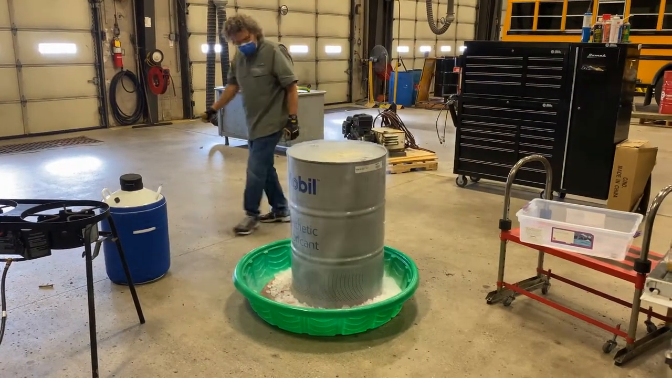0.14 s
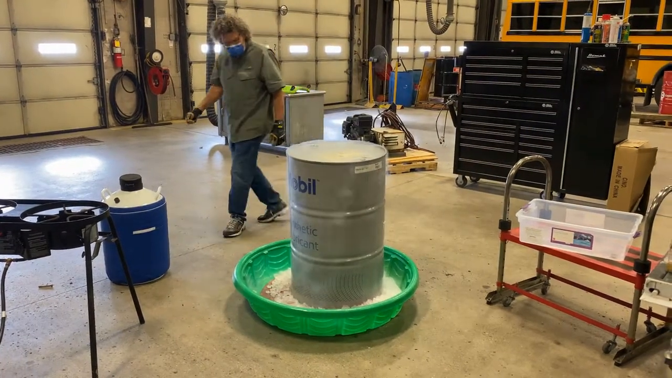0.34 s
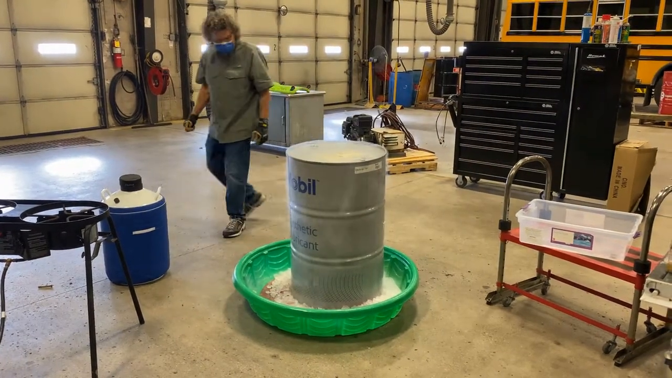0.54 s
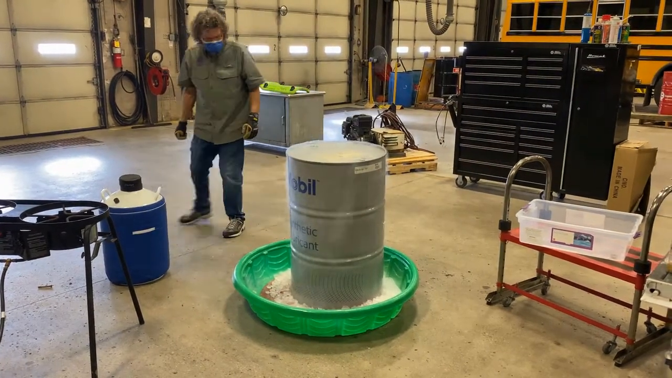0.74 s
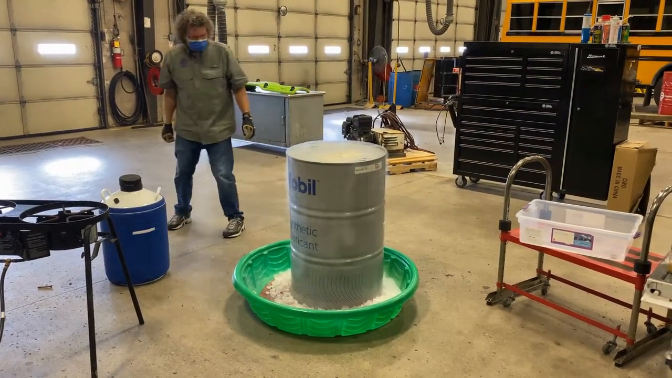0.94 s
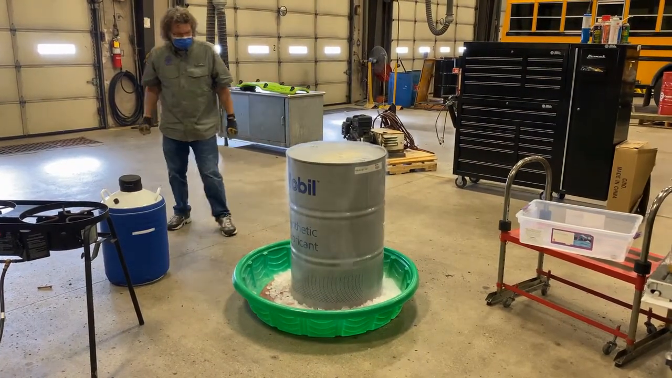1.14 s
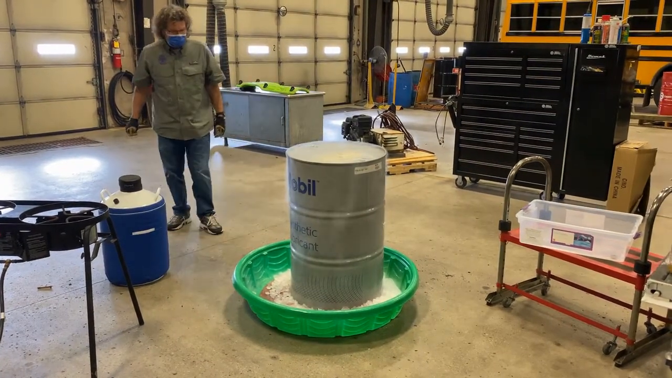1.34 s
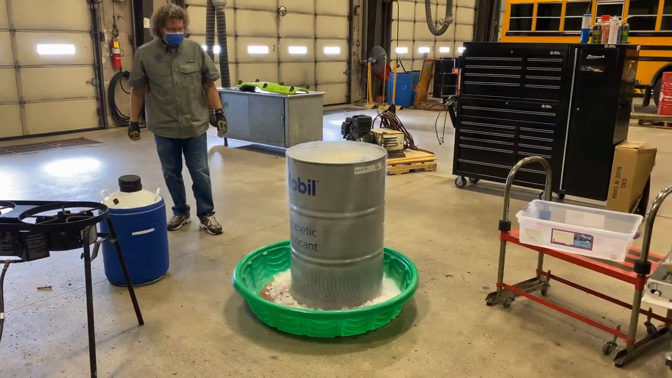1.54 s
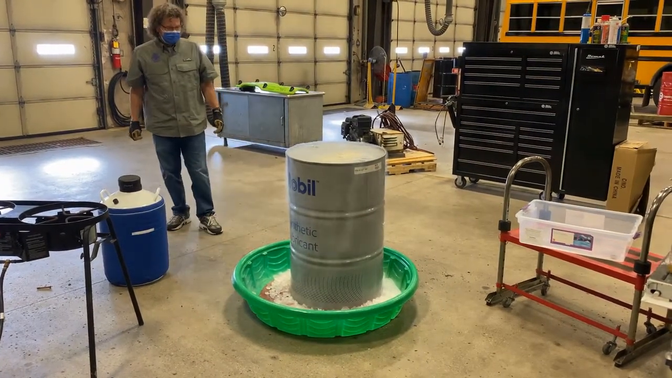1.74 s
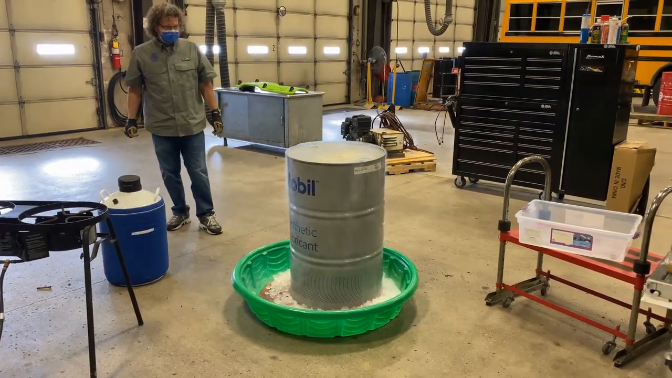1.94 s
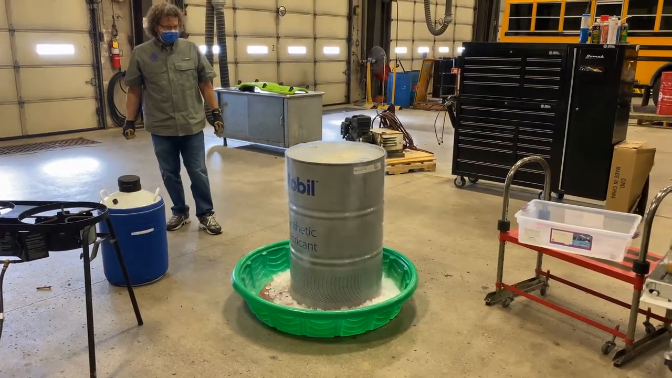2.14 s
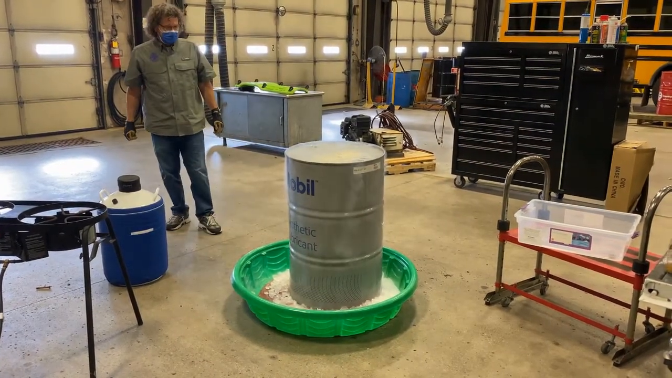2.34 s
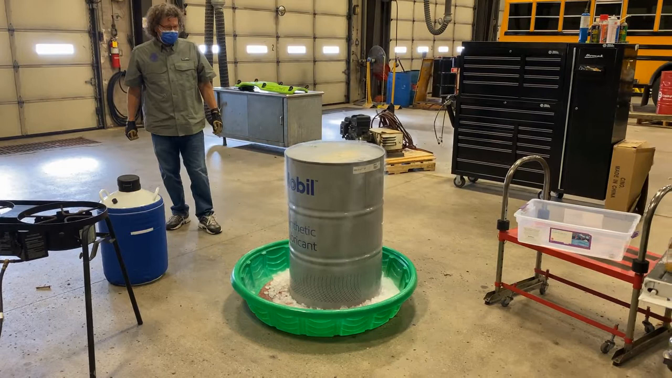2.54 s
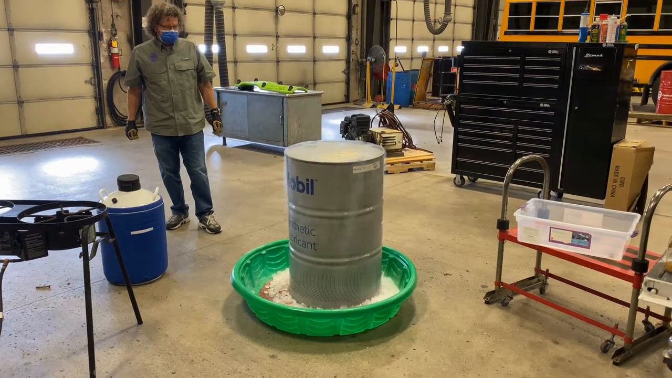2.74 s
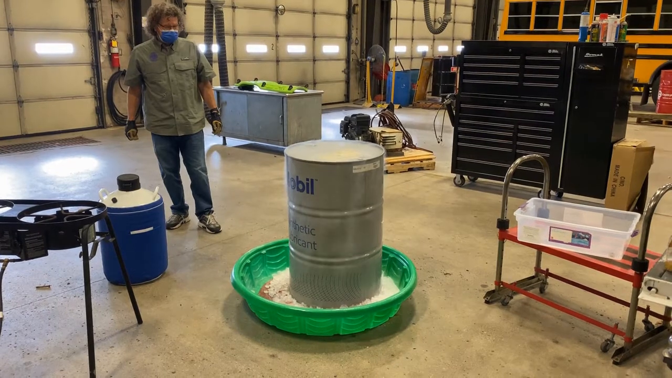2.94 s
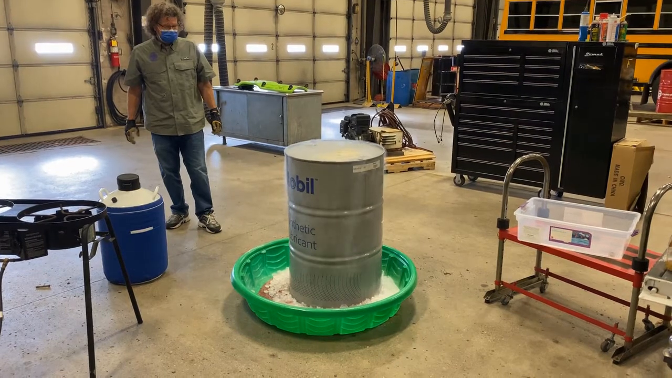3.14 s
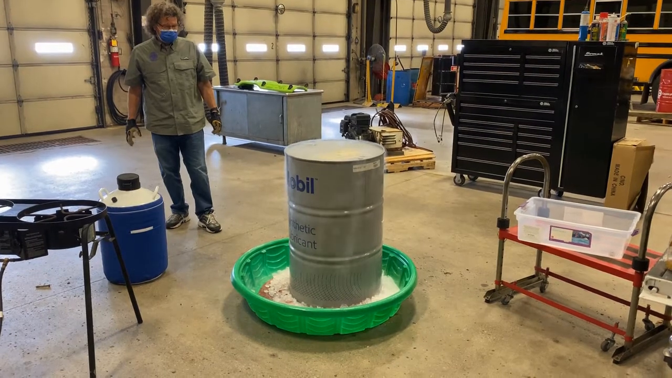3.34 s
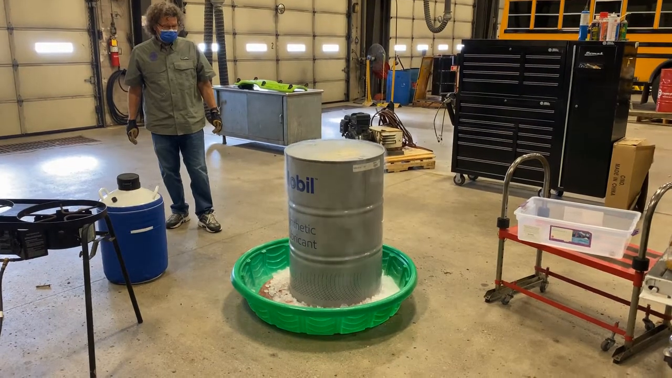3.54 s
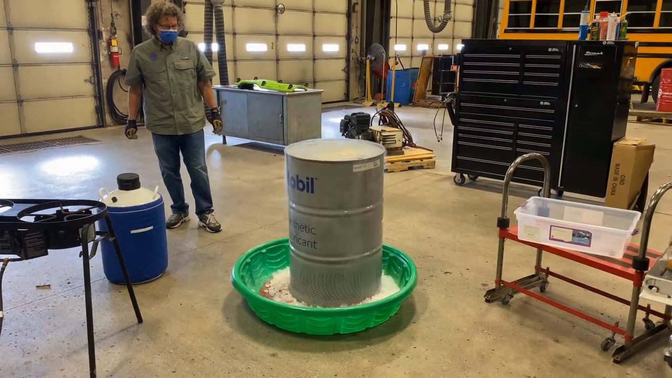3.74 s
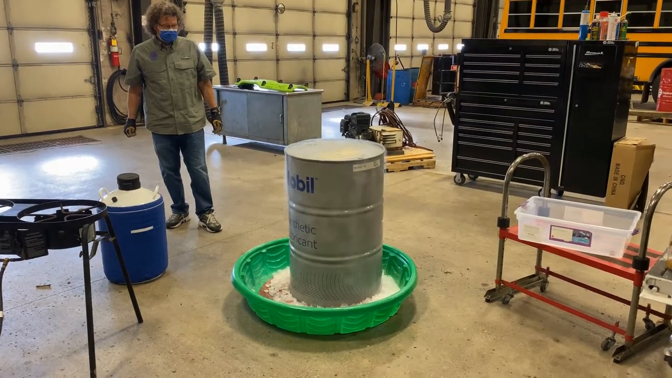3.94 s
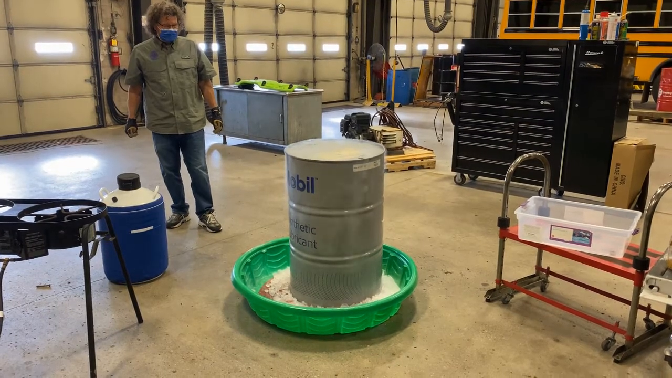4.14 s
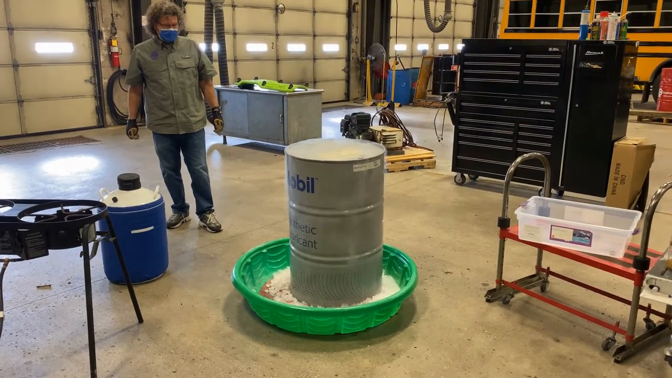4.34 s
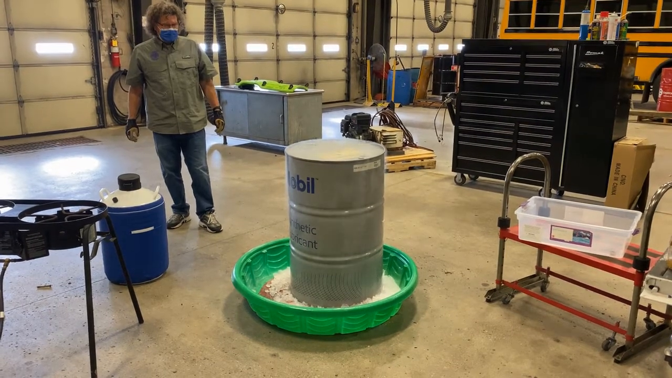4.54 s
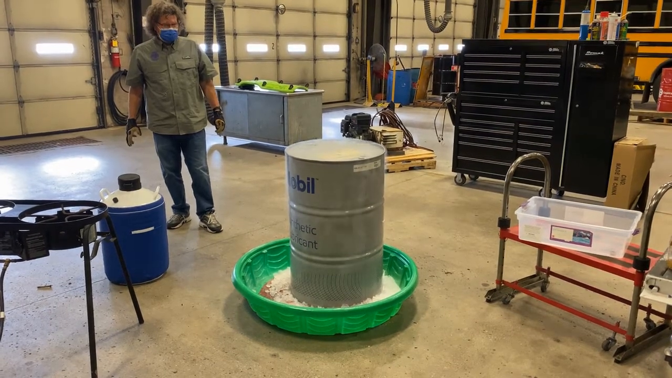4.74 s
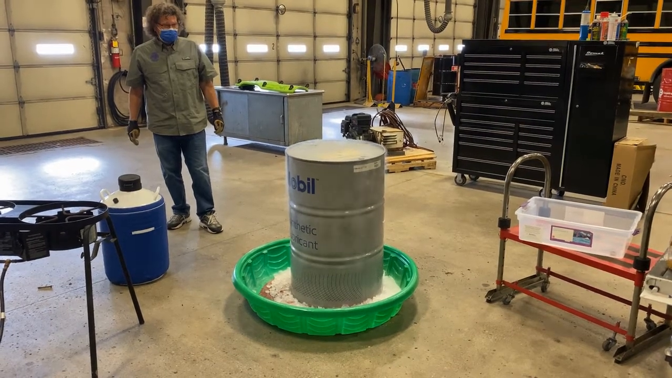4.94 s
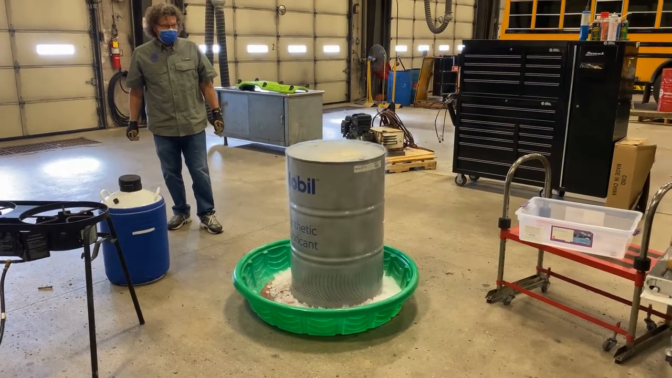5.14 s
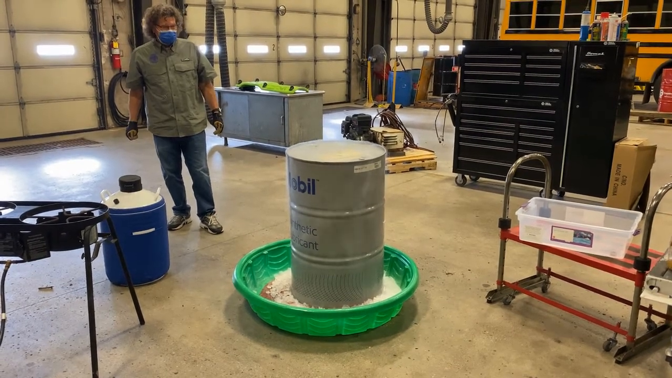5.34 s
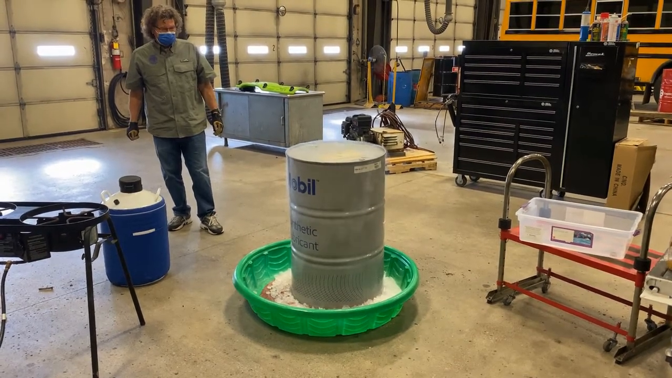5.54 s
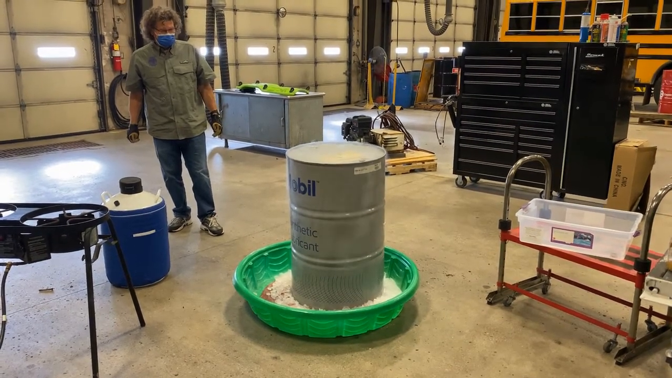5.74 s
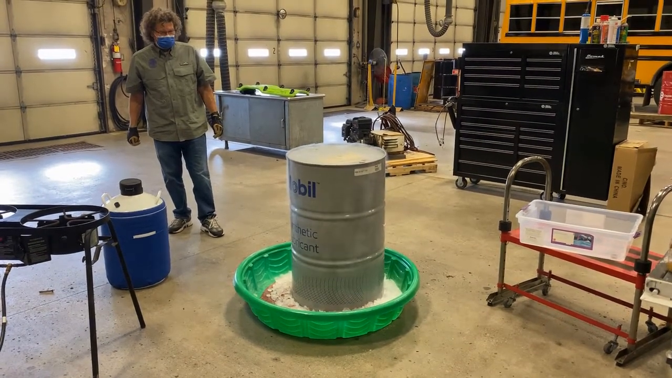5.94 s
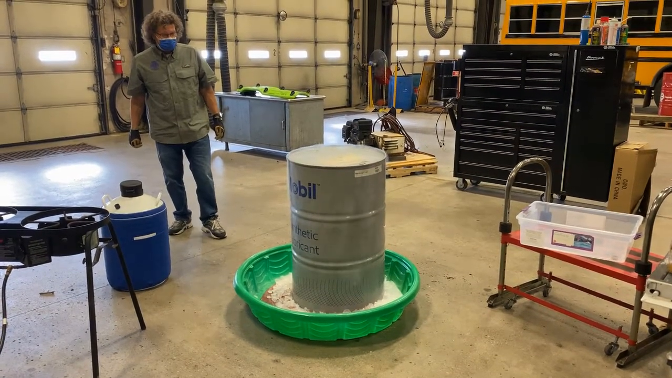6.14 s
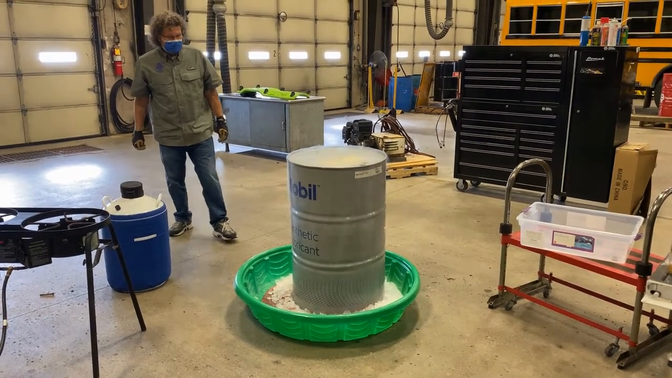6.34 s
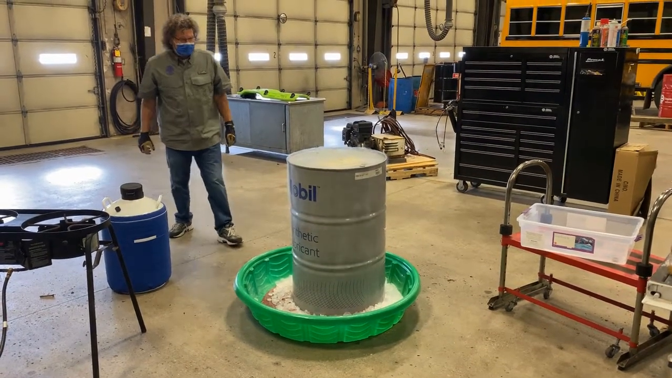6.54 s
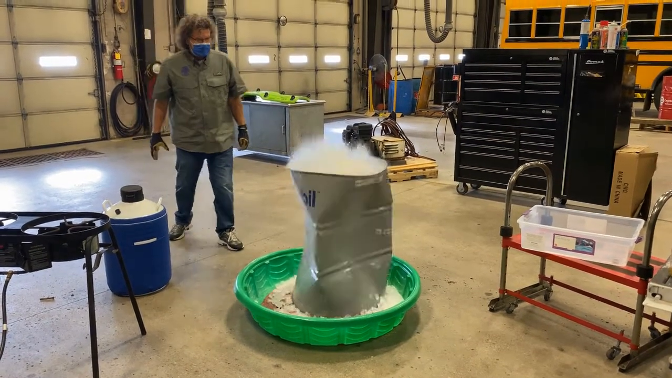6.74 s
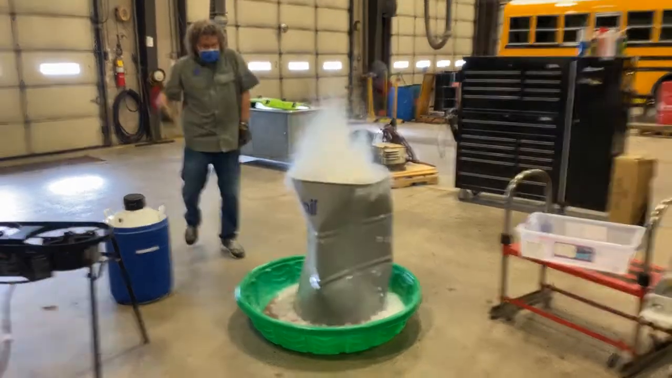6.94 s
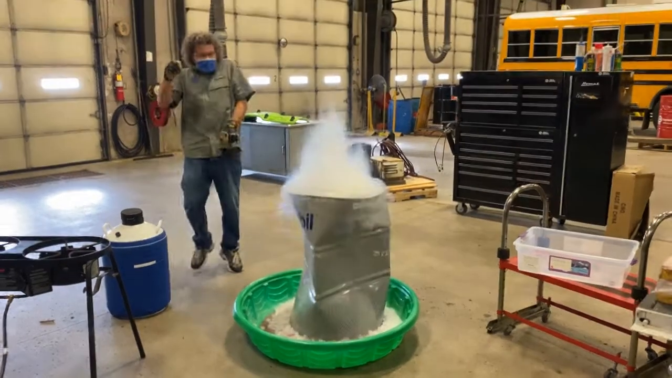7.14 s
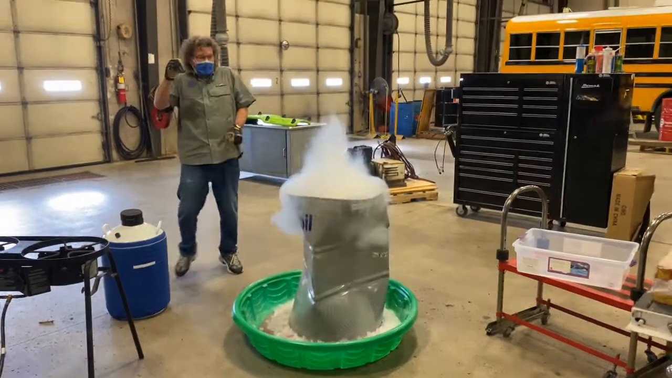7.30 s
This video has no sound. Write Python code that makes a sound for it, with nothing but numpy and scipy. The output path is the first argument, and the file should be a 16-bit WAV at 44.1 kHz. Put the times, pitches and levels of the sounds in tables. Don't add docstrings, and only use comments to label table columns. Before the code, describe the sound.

Wide stereo microphone a few metres from a steel drum in an echoing garage. Constant low motor hum and airy hiss form the bed. Tiny metal ticks and faint bright snaps come irregularly, with a strong clank early and softer clanks later. One faint gritty footstep scuff is heard. Finally the wall buckles abruptly, very loud, crackling and booming, followed by a low reverberant tail, squashed by automatic gain.

```python
import sys
import numpy as np
from scipy import signal
from scipy.fft import rfft, irfft, next_fast_len
from scipy.io import wavfile

SR = 44100
rng = np.random.default_rng(int(sys.argv[2]) if len(sys.argv) > 2 else 0)


def generate_wav(sig):
    pcm = np.round(np.clip(np.atleast_2d(sig).T, -1, 1) * 32767).astype(np.int16)
    wavfile.write(sys.argv[1], SR, pcm)


def natural_amplitude(level_db):
    exponent = np.asarray(level_db, float) / 20
    return 10 ** exponent


N = 325017

# [multiple, rms level/dB, left-right level/dB]
STRONG_HARMONICS = [(6, -53, -4), (8, -55, -2), (9, -55, -5), (10, -53, -2), (11, -49, -3), (12, -54, -3),
                    (14, -50, -12), (15, -46, -5), (16, -46, -4), (17, -51, -8), (20, -49, -2),
                    (22, -52, -1), (24, -57, -13), (36, -64, -12)]
# [f/Hz, rms level/dB]
MOTOR_TONES = [(35.0, -61), (59.5, -60), (120.02, -58), (240.04, -62), (468.9, -69), (937.9, -65),
               (1124.7, -75), (1248, -71), (2616, -75)]
# [f/Hz, level/dB per Hz]
AIR_SPECTRUM = [(14, -29), (26, -3), (36, 19), (60, 25), (150, 18), (240, 7), (320, 4), (480, -2),
                (760, -12), (1300, -13.5), (2600, -14.5), (3400, -12.5), (5000, -18), (9000, -17.5),
                (14300, -23)]
# [f/Hz, shared part/0..1]
PORT_LIKENESS = [(40, .98), (130, .9), (290, .45), (640, .15), (1400, .25), (3100, .4), (4500, .1),
                 (5800, .5), (8000, .58), (10500, .9), (14000, .9)]
# [f/Hz, width/Hz, level/dB]
DUCT_PEAKS = [(942, 57, 4), (1270, 410, 4.5), (1800, 96, 3), (2144, 220, 4), (2627, 480, 7)]
# [f/Hz, level/dB, t60/s]
SHELL_MODES = [(1230, -1, .016), (1550, -1, .016), (1750, 0, .016), (2100, -2, .014), (2560, 0, .016),
               (2850, -3, .014), (3200, -7, .012), (3800, -17, .01), (4400, -9, .01), (5300, -10, .01),
               (7300, -11, .008)]
# [t/s, peak level/dB, ring f/Hz, lid knock level/dB, hall level/dB]
CLANKS = [
    (0.617, -13.5, 1920, -29, -15.5),
    (0.629, -21.5, 4140, -13, -41),
    (2.149, -23, 2450, -27, -17),
    (3.0959, -22, 2330, -13, -16.5),
    (4.0812, -25, 2640, -39, -18.5),
    (6.7402, -3, 1440, -18, -4),
]
# [t/s, peak level/dB, ring f/Hz]
TOCKS = [(0.385, -35.5, 2840), (0.5151, -35.5, 2550), (0.7572, -33, 1700), (3.029, -41.5, 1270),
         (3.32, -32, 2340), (3.7309, -41, 2620), (4.3134, -35, 2100), (5.6508, -40, 1860),
         (6.0881, -35.5, 2800), (6.5614, -33.5, 1410), (6.6494, -44, 1990)]
# [t/s, peak level/dB, ring f/Hz]
TICKS = [(0.0782, -34, 1650), (0.2376, -38, 1720), (0.6537, -28, 2480), (1.0558, -40, 1580),
         (1.0839, -38, 2540), (1.5068, -34.5, 2780), (1.7589, -39.5, 2630), (2.343, -40, 5400),
         (2.799, -35.5, 1270), (3.2265, -35, 2530), (3.4913, -35, 1880), (3.5154, -42, 2640),
         (4.783, -39.5, 2740), (4.8359, -39, 2780), (5.0693, -36.5, 1840), (6.1407, -39, 1250),
         (6.2316, -38.5, 1460), (6.555, -31.5, 2420)]
# [t/s, peak level/dB, ring f/Hz]
SNAPS = [(2.2463, -43, 1280), (3.9177, -47.5, 2660), (4.0919, -41, 1430), (5.2114, -41.5, 2690),
         (5.475, -44, 3050), (5.5797, -45.5, 2530), (6.0042, -47, 1759), (6.0432, -45.5, 1460),
         (6.2934, -46, 1250), (6.6878, -40.5, 1980)]
# [t/s, level/dB]
BUCKLE_FORCE = [
    (6.689, -42),
    (6.718, -41),
    (6.722, -23.5),
    (6.732, -11),
    (6.7435, -10.5),
    (6.75, -22.5),
    (6.757, -14.5),
    (6.81, -28),
    (6.93, -58),
]
# [start t/s, f/Hz, peak level/dB, t60/s, sign]
AIR_SWINGS = [
    (6.7345, 190, -8, .03, -1),
    (6.7425, 170, -5, .02, 1),
    (6.7452, 84, 2, .13, -1),
    (6.7455, 150, -4, .03, -1),
    (6.775, 97, -4, .45, -1),
    (6.747, 8, -5, .3, 1),
    (6.83, 79, -12, 2.5, 1),
]
# [f/Hz, level/dB per Hz, t60/s]
HALL_TAIL = [(30, -38, 1.6), (50, -3.5, 1.2), (80.5, 0.5, 1.43), (105.6, -1.5, 1.22), (172, -15, 1.08),
             (277, -16, 0.92), (347, -20, 1.31), (533, -25, 0.97), (865, -26, 1.23), (1720, -25.5, 1.29),
             (2800, -29.5, 1.33), (4120, -38, 1.43), (7700, -48.5, 0.44), (8700, -57, 0.96),
             (15300, -70, 0.14)]

THROB_HZ = 10.193
WEAK_DB, WEAK_KNEE, WEAK_STEP_DB, WEAK_FALL_DB, WEAK_PAN_DB = -58, 24.5, -9, -0.3, 20.0
RUMBLE_DB, HISS_DB, HISS_FADE_DB_PER_S = -39, -52.5, 0.64
PORT_LAG_S, BASS_LAG_S, PORT_SPLIT_HZ, PORT_BEND_HZ, PORT_PAN_DB = .000198, -.00004, 4400, 775, -4.0
CLANK_CRACK_DB, TOCK_CRACK_DB, TICK_CRACK_DB, SNAP_CRACK_DB = -20.5, -19, -11.5, -4
KNOCK_DB, TOCK_HALL_DB, TICK_HALL_DB, SNAP_HALL_DB = -15, -18, -11, -16
LID_HZ, LID_T60_S = 565, 0.012
PING_HZ, PING_DB, LOW_PING_HZ, LOW_PING_DB, PING_T60_S = 7450, -1.5, 5140, -6.5, 0.0042
SCUFF_S, SCUFF_RISE_S, SCUFF_HOLD_S, SCUFF_FALL_S, SCUFF_DB = 1.04, 0.07, 0.23, 0.1, -52
SCUFF_LOW_HZ, SCUFF_HIGH_HZ, GRIT_PER_S = 1150, 3240, 2700
FOLDS_PER_S = 7000
TEAR_S, CREAK_RASP_DB, TEAR_RASP_DB, LATE_RASP_DB, RASP_FADE_S = 6.721, -2, 5, -22.5, 0.026
BANG_S, BANG_TAIL_DB = 6.75, -9.5
DIVE_S, DIVE_DB, DIVE_TIME_S = 6.75, -17.5, 0.029
CLIMB_S, CLIMB_DB, CLIMB_TIME_S, SAG_DB_PER_S = 6.9, 12, 0.2, 3
CUTOFF_HZ = 15900


def at_hz(points, hz, axis=1):
    return np.interp(np.log(hz + 1), np.log(np.array(points)[:, 0]), np.array(points)[:, axis])


def rms_one(x):
    return x / np.sqrt(np.mean(x ** 2) + 1e-20)


def peak_one(x):
    return x / abs(x).max()


def band_pass(x, low_hz, high_hz, order=2):
    return signal.sosfilt(signal.butter(order, [low_hz, high_hz], "band", fs=SR, output="sos"), x)


def smooth(x, hz):
    return signal.sosfiltfilt(signal.butter(2, hz, fs=SR, output="sos"), x)


def ring(clicks, hz, t60):
    r, w = natural_amplitude(-60 / (t60 * SR)), 2 * np.pi * hz / SR
    return signal.lfilter([0, np.sin(w)], [1, -2 * r * np.cos(w), r * r], clicks + 1e-18)


def ports(x):
    size = next_fast_len(len(x))
    hz = np.arange(size // 2 + 1) * SR / size
    treble = 1 / (1 + (PORT_SPLIT_HZ / (hz + 1)) ** 12)
    lag = treble * PORT_LAG_S * (1 - PORT_BEND_HZ / (hz + 1)) + (1 - treble) * BASS_LAG_S
    pan = natural_amplitude((1 - treble) * PORT_PAN_DB / 2)
    sound = rfft(x, size)
    left = sound * pan * np.exp(-2j * np.pi * hz * lag)
    return irfft([left, sound / pan], size)[:, :len(x)]


def stereo_noise(size, alike_scale):
    hz = np.arange(size // 2 + 1) * SR / size
    alike = np.clip(alike_scale(hz), 0, 1)
    shared = rfft(ports(rng.standard_normal(size)))
    own = rfft(rng.standard_normal((2, size)))
    return hz, np.sqrt(alike) * shared + np.sqrt(1 - alike) * own


def harmonics():
    strong = {k: (db, pan_db) for k, db, pan_db in STRONG_HARMONICS}
    lines = []
    for k in range(5, 48):
        weak_db = WEAK_DB + (k > WEAK_KNEE) * (WEAK_STEP_DB + WEAK_FALL_DB * (k - WEAK_KNEE))
        lines.append((k * THROB_HZ, *strong.get(k, (weak_db, None))))
    return lines


def compressor():
    t, out = np.arange(N) / SR, np.zeros((2, N))
    lines = harmonics() + [(hz, db, -3.0) for hz, db in MOTOR_TONES]
    for (hz, db, pan_db), (turn, skew) in zip(lines, rng.random((len(lines), 2))):
        if pan_db is None:
            pan_db = PORT_PAN_DB + WEAK_PAN_DB * (turn - .5)
        left = 1 / (1 + natural_amplitude(-2 * pan_db))
        phase = 2 * np.pi * (hz * t + turn)
        out_of_step = (skew - .6) * min((hz / 200) ** 2, 6)
        out[0] += natural_amplitude(db) * 2 * np.sqrt(left) * np.sin(phase + out_of_step)
        out[1] += natural_amplitude(db) * 2 * np.sqrt(1 - left) * np.sin(phase)
    return out


def ventilation():
    hiss_db = HISS_DB - HISS_FADE_DB_PER_S * np.arange(N) / SR
    hz, noise = stereo_noise(next_fast_len(N), lambda f: at_hz(PORT_LIKENESS, f))
    colour_db = at_hz(AIR_SPECTRUM, hz)
    for peak_hz, width, db in DUCT_PEAKS:
        colour_db = colour_db + db / (1 + (2 * (hz - peak_hz) / width) ** 2)
    noise = noise * natural_amplitude(colour_db)
    low = 1 / (1 + (hz / 600) ** 4)
    rumble = rms_one(irfft(noise * low)[:, :N])
    hiss = rms_one(irfft(noise * (1 - low))[:, :N])
    return natural_amplitude(RUMBLE_DB - 5.5) * rumble + natural_amplitude(hiss_db + 3.0) * hiss


def hall(tilt_db):
    def alike(f):
        return np.where((f > 500) & (f < 6000), .15, np.sqrt(at_hz(PORT_LIKENESS, f)))

    size = next_fast_len(2 * SR)
    hz, noise = stereo_noise(size, alike)
    noise = noise * natural_amplitude(at_hz(HALL_TAIL, hz) + tilt_db * np.log2(2000 / (hz + 30)))
    t, out = np.arange(size) / SR, 0
    for centre in 2 ** np.arange(4.5, 14.5, .5):
        band = np.clip(1 - 2 * abs(np.log2((hz + 1) / centre)), 0, 1)
        build = 1 - np.exp(-(t / (.012 + 6 / centre)) ** 2)
        decay = natural_amplitude(-60 * t / at_hz(HALL_TAIL, centre, axis=2))
        out = out + irfft(noise * band, size) * build * decay
    return out


def slips():
    rows = [(s, db, hz, CLANK_CRACK_DB, knock_db, hall_db) for s, db, hz, knock_db, hall_db in CLANKS]
    kinds = ((TOCKS, TOCK_CRACK_DB, TOCK_HALL_DB),
             (TICKS, TICK_CRACK_DB, TICK_HALL_DB),
             (SNAPS, SNAP_CRACK_DB, SNAP_HALL_DB))
    for kind, crack_db, hall_db in kinds:
        rows += [(*row, crack_db, KNOCK_DB, hall_db) for row in kind]
    return sorted(rows)


def shell_ring(stutter, hz, scatter):
    body = 0
    for (mode_hz, mode_db, t60), d in zip(SHELL_MODES, scatter):
        db = mode_db + 2.0 * d - 3.9 * abs(np.log2(mode_hz / hz))
        body = body + natural_amplitude(db) * ring(stutter, mode_hz * (1 + d / 40), t60)
    tick = peak_one(body) + .35 * peak_one(ring(stutter, hz, .02))
    return band_pass(tick, 1180, max(3300, 1.4 * hz), order=4)


def rim_crack(noise, stutter, t):
    burst = band_pass(noise * (np.exp(-t / 0.003) + 0.35 * np.exp(-t / 0.023)), 3800, 13000)
    ping = peak_one(ring(stutter, PING_HZ, PING_T60_S))
    low_ping = peak_one(ring(stutter, LOW_PING_HZ, PING_T60_S))
    return peak_one(burst) + natural_amplitude(PING_DB) * ping + natural_amplitude(LOW_PING_DB) * low_ping


def ticks():
    direct, into_hall, t = np.zeros(N), np.zeros(N), np.arange(2000) / SR
    for s, db, hz, crack_db, knock_db, hall_db in slips():
        stutter = rng.standard_normal(2000) ** 3 * t * np.exp(-t / 0.0013)
        tick = shell_ring(stutter, hz, rng.standard_normal(len(SHELL_MODES)))
        crack = rim_crack(rng.standard_normal(2000), stutter, t)
        knock = ring(stutter, LID_HZ, LID_T60_S)
        slip = peak_one(tick) + natural_amplitude(crack_db + 12.0) * peak_one(crack) + natural_amplitude(knock_db) * peak_one(knock)
        at = round(s * SR)
        direct[at:at + 2000] += natural_amplitude(db) * slip
        into_hall[at] = natural_amplitude(db + hall_db)
    echo = signal.fftconvolve(into_hall[None], peak_one(hall(tilt_db=-4.5)))[:, :N]
    return ports(direct) + echo


def scuff():
    corners = np.cumsum([0, SCUFF_RISE_S, SCUFF_HOLD_S, SCUFF_FALL_S])
    out, at, size = np.zeros((2, N)), round(SCUFF_S * SR), SR // 2
    grains = rng.random((2, size)) < GRIT_PER_S / SR
    grit = rng.standard_normal((2, size)) * (0.3 + grains)
    grit = rms_one(band_pass(grit, SCUFF_LOW_HZ, SCUFF_HIGH_HZ))
    swell = np.interp(np.arange(size) / SR, corners, [0, 1, 1, 0])
    out[:, at:at + size] = natural_amplitude(SCUFF_DB) * grit * swell * natural_amplitude([[-2.0], [2.0]])
    return out


def creases():
    start, size = round(BUCKLE_FORCE[0][0] * SR), SR // 4
    t = (start + np.arange(size)) / SR
    shape = (3, size)
    height = natural_amplitude(5.5 * np.minimum(rng.exponential(1, shape), 4))
    folds = height * rng.choice([-1, 1], shape) * (rng.random(shape) < FOLDS_PER_S / SR)
    body = 0
    for k, (hz, db, t60) in enumerate(SHELL_MODES):
        body = body + natural_amplitude(db) * ring(np.roll(folds, 997 * k, axis=1), hz, 0.94 * t60)
    rasp = signal.sosfilt(signal.butter(2, 3500, "high", fs=SR, output="sos"), folds)
    boom = band_pass(folds, 240, 640)
    wall = rms_one(body) + natural_amplitude(-9.0) * rms_one(boom)
    age = t - TEAR_S
    torn_db = LATE_RASP_DB + (TEAR_RASP_DB - LATE_RASP_DB) * np.exp(-abs(age) / RASP_FADE_S)
    wall[0] += natural_amplitude(np.where(age < 0, CREAK_RASP_DB, torn_db)) * rms_one(rasp[0])
    shared, *own = natural_amplitude(np.interp(t, *np.transpose(BUCKLE_FORCE))) * wall
    out = np.zeros((2, N))
    out[:, start:start + size] = 0.56 * ports(shared) + 0.94 * np.array(own) * natural_amplitude([[-5.0], [1.0]])
    return out


def thump():
    out, start = np.zeros(N), round(AIR_SWINGS[0][0] * SR)
    t = np.arange(start, N) / SR
    for s, hz, db, t60, sign in AIR_SWINGS:
        age = np.maximum(t - s, 0)
        out[start:] += np.sign(sign) * natural_amplitude(db - 60 * age / t60) * np.sin(2 * np.pi * hz * age)
    return out * natural_amplitude([[-1.2], [1.2]])


def bang_tail():
    out, at = np.zeros((2, N)), round(BANG_S * SR)
    tail = rms_one(hall(tilt_db=0)[:, :N - at])
    bass = smooth(tail, 500)
    lumps = natural_amplitude(1.5 * rms_one(smooth(rng.standard_normal(N - at), 120)))
    out[:, at:] = natural_amplitude(BANG_TAIL_DB) * (bass + lumps * (tail - bass))
    return out


def gain_db():
    t = np.arange(N) / SR
    dive = 1 - np.exp(-np.maximum(t - DIVE_S, 0) / DIVE_TIME_S)
    climb = np.sin(np.pi / 2 * np.clip((t - CLIMB_S) / CLIMB_TIME_S, 0, 1)) ** 2
    sag = SAG_DB_PER_S * np.maximum(t - CLIMB_S - CLIMB_TIME_S, 0)
    return DIVE_DB * dive + CLIMB_DB * climb - sag


def scene():
    room = compressor() + ventilation() + scuff()
    return room + ticks() + creases() + thump() + bang_tail()


def band_limit(x):
    return signal.sosfilt(signal.butter(12, 16630, fs=SR, output="sos"), x)


def record(dry):
    held = 1.025 * np.tanh(dry * natural_amplitude(gain_db()) / 0.97)
    mix = signal.sosfilt(signal.ellip(8, .5, 45, CUTOFF_HZ, fs=SR, output="sos"), held)
    return band_limit(mix)


dry = scene()
out = record(dry)
generate_wav(out)
```